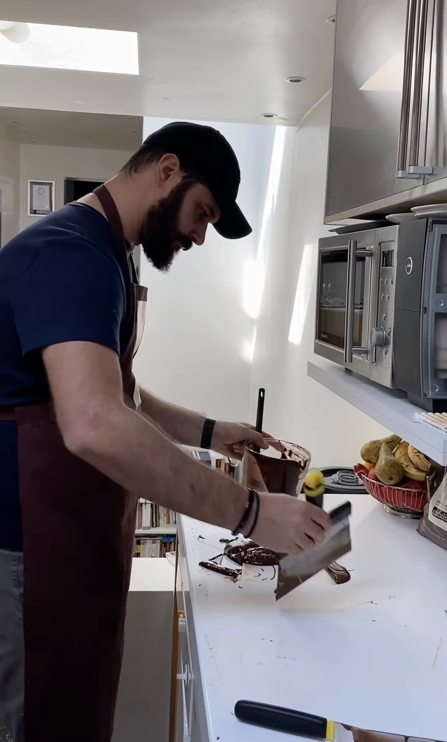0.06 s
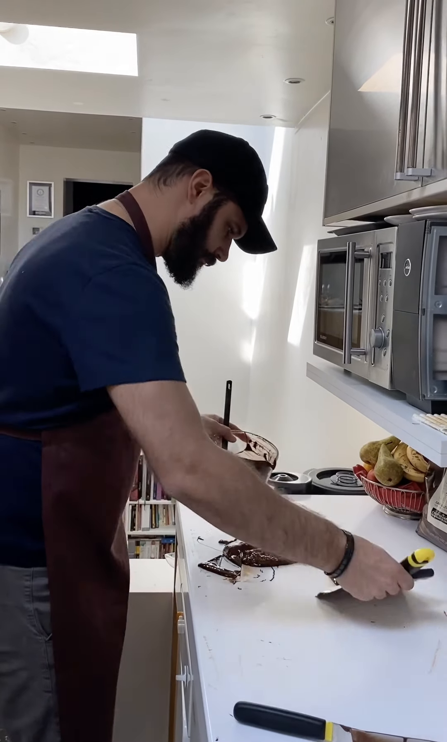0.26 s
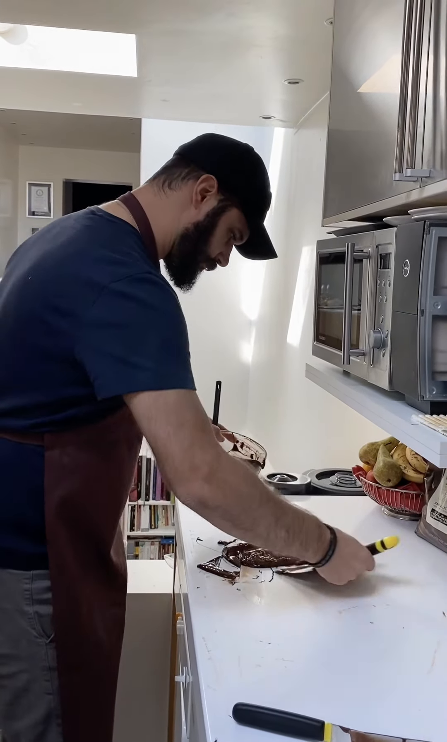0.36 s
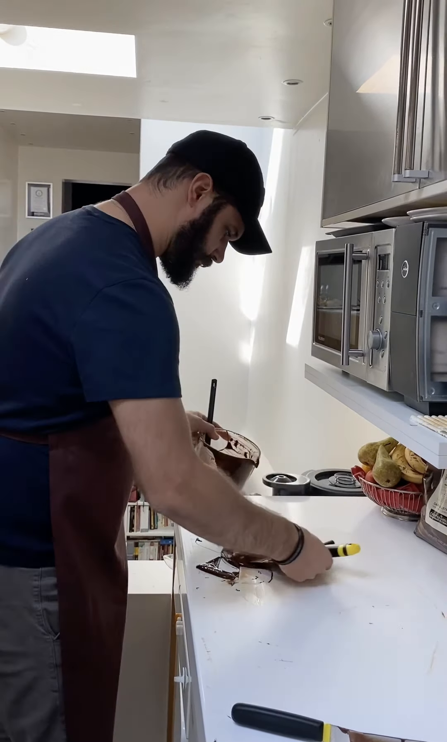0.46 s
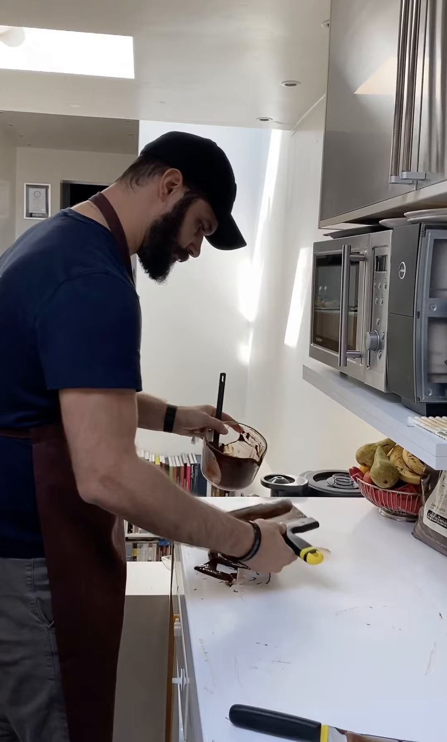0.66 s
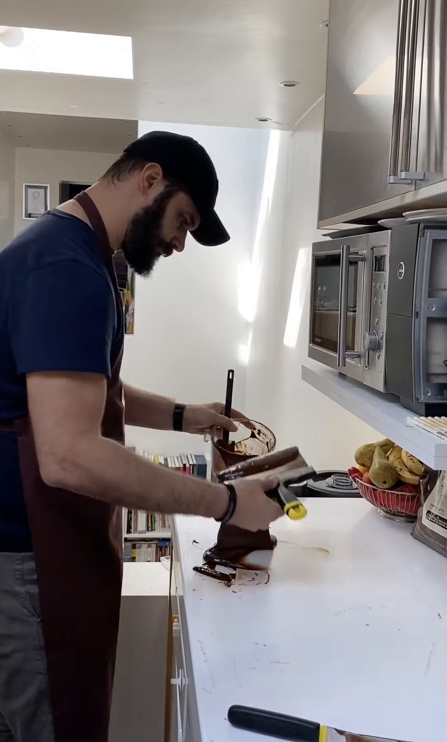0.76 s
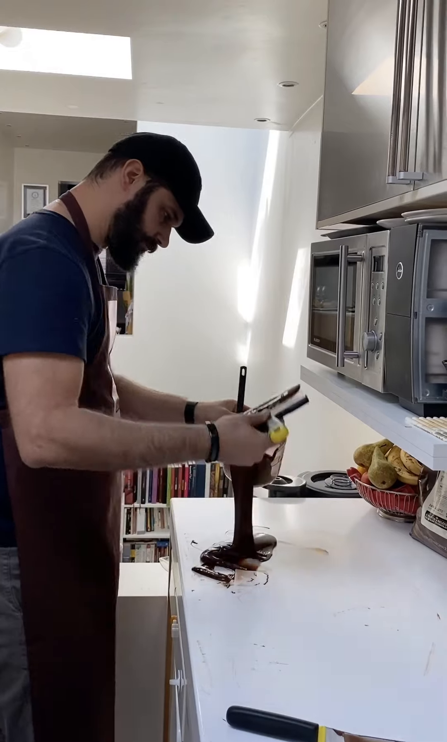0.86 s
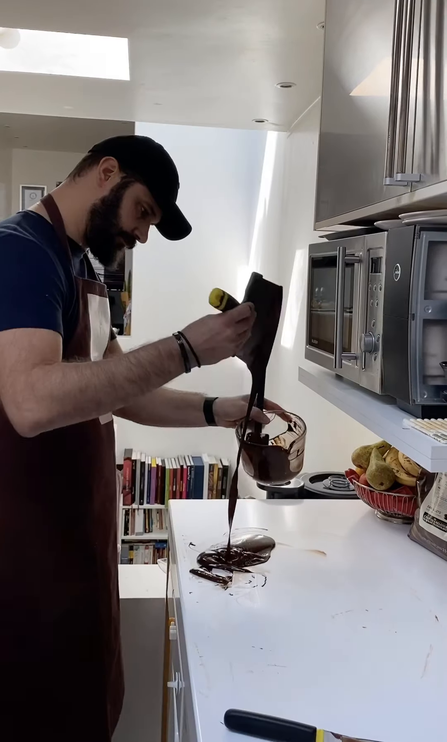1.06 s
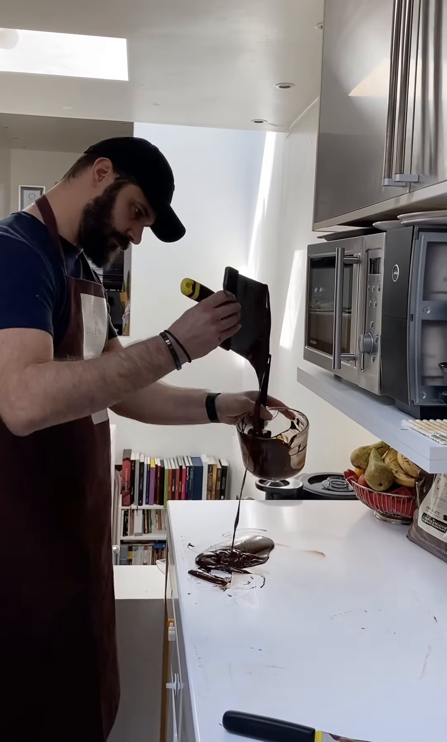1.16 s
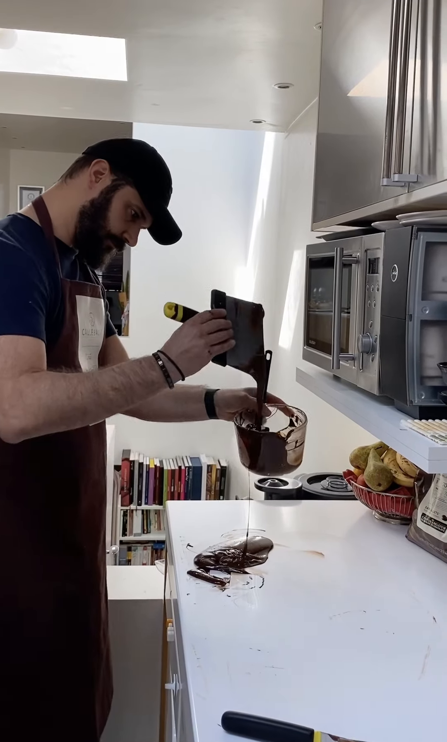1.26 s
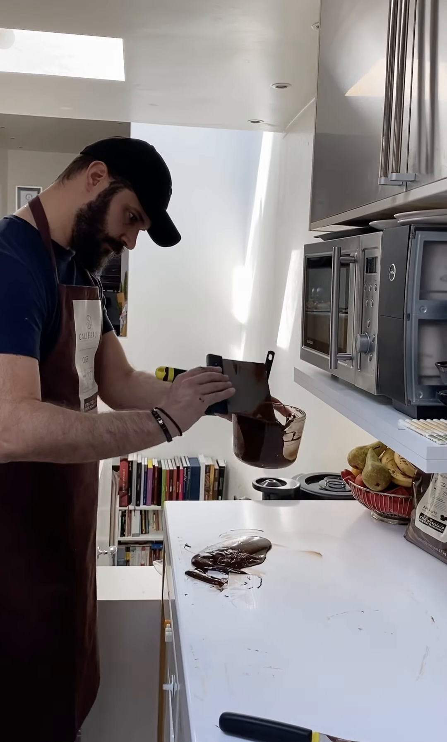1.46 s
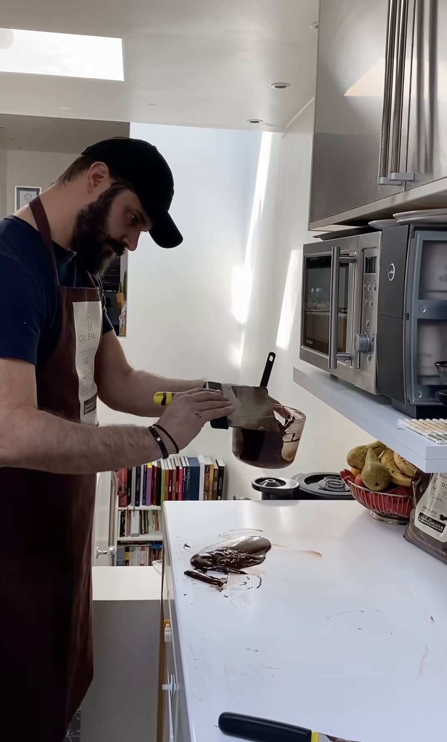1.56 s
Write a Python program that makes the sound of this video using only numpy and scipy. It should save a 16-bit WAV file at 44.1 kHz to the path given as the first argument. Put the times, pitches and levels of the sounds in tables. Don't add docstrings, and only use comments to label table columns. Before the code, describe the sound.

A metal scraper hits and scrapes a stone counter, close in stereo. Its edge ticks at 0.06 s, slides briefly, then clacks loudly at 0.13 s with a short metallic ring and chatter. A bright gritty drag swells around 0.3 s and fades by 0.5 s. Quiet room hum remains; cloth rustles near 1.05 s, a bowl is faintly tapped at 1.42 s, and a soft wipe starts by 1.6 s.

```python
import sys
import numpy as np
from scipy import signal
from scipy.fft import rfft, irfft
from scipy.io import wavfile
from scipy.ndimage import uniform_filter1d

SR = 44100
rng = np.random.default_rng(int(sys.argv[2]) if len(sys.argv) > 2 else 0)


def nominal_scale(level):
    x = np.asarray(level, float) / 20
    return 10 ** x


def generate_wav(signal):
    frames = np.transpose(np.atleast_2d(signal))
    scaled = np.clip(frames, -1, 1) * 32767
    pcm = np.round(scaled).astype(np.int16)
    wavfile.write(sys.argv[1], SR, pcm)


N = 70560


def read(points, hz):
    f, value = np.transpose(points)
    return np.interp(np.log(hz + 1), np.log(f + 1), value)


def evened(x):
    return x / np.sqrt(np.mean(x ** 2) + 1e-20)


def coloured(x, points):
    hz = np.fft.rfftfreq(N, 1 / SR)
    return irfft(rfft(x) * nominal_scale(read(points, hz)), N)


def along(points):
    s, db = np.transpose(points)[:2]
    level = np.interp(np.arange(N) / SR, s, db, left=-150, right=-150)
    return uniform_filter1d(nominal_scale(level), size=90)


def add(mix, s, sound):
    part = mix[round(s * SR):][:len(sound)]
    part += sound[:len(part)]


def resonate(x, hz, width):
    turn = np.exp(2j * np.pi * hz * np.arange(len(x)) / SR)
    r = np.exp(-np.pi * width / SR)
    return 2 * (turn * signal.lfilter([1 - r], [1, -r], x / turn + 1e-18)).real


def alike(a, b, points):
    same = np.clip(read(points, np.fft.rfftfreq(len(a), 1 / SR)), -1, 1)
    mid = rfft(a) * np.sqrt(1 + same)
    side = rfft(b) * np.sqrt(1 - same)
    return irfft(np.array([mid + side, mid - side]), len(a)) / np.sqrt(2)


def ports(x):
    # (frequency [Hz], level [dB])
    side_colour = [(60, -33), (300, -17.5), (1000, -9.5), (1700, -6), (2600, -4.5), (5300, 3.5), (6000, -4),
                   (15000, 5)]
    turn_rad, delay_s = 3.8, .00054
    hz = np.fft.rfftfreq(N, 1 / SR)
    phase = turn_rad + 2 * np.pi * hz * delay_s
    side = irfft(rfft(x) * nominal_scale(read(side_colour, hz)) * np.exp(-1j * phase), N)
    return np.array([x + side, x - side])


def kitchen():
    # (frequency [Hz], level [dB per Hz])
    hum_colour = [(25, -22), (60, -10), (130, -24.5), (300, -23), (600, -33.5), (1300, -39.5), (2500, -44),
                  (15000, -69.5)]
    # (frequency [Hz], likeness [-1 to 1])
    hum_same = [(60, 0.81), (180, 0.72), (550, 0.1), (1650, 1), (4970, -0.15), (15000, -0.66)]
    hum_db, motor_db = -59.5, -57.5
    motor_hz, motor_width_hz = 84, 30
    throb_per_s, throb = 10, .7
    a, b, c, d = rng.standard_normal((4, N))
    around = alike(coloured(a, hum_colour), coloured(b, hum_colour), hum_same)
    air = evened(around + 0.27 * ports(coloured(d, hum_colour)))
    motor = resonate(resonate(c, motor_hz, motor_width_hz), motor_hz, motor_width_hz)
    wander = evened(resonate(c[::-1], 1.5, 6))
    beat = np.cumsum(throb_per_s * (1 + 0.11 * wander)) / SR
    steady = motor / (abs(signal.hilbert(motor)) + 0.1 * motor.std())
    motor = steady * (1 + throb * np.cos(2 * np.pi * beat))
    motor = resonate(resonate(motor, motor_hz, 45), motor_hz, 45)
    return nominal_scale(hum_db) * air + nominal_scale(motor_db) * evened(motor)


def friction(colour, sing_db):
    # (frequency [Hz], width [Hz], level [dB])
    blade_song = [(1083, 330, -0.5), (1870, 90, -12), (2770, 150, -10.5), (3900, 150, -6),
                  (4340, 37, -10.5), (5450, 400, -6.5), (7000, 250, -8.5), (9300, 150, -13)]
    grains_per_s, grain_spread_db = 5900, 3.5
    sizes = nominal_scale(grain_spread_db * np.minimum(rng.exponential(1, N), 4))
    slips = sizes * rng.choice([-1., 1.], N) * (rng.random(N) < grains_per_s / SR)
    sing = sum(nominal_scale(db) * evened(resonate(slips, hz, width)) for hz, width, db in blade_song)
    return evened(evened(coloured(slips, colour)) + nominal_scale(sing_db) * evened(sing))


def sleeve():
    # (frequency [Hz], level [dB])
    cloth = [(250, -9.5), (900, 4.5), (2400, 2.5), (4000, -4), (6000, -4), (9000, -10), (12000, -10.5),
             (16500, -13.5)]
    # (time [s], level [dB])
    reach = [(0, -76), (.066, -76)]
    # (time [s], level [dB])
    lift = [(.6, -73.5), (.8, -74), (.92, -73.5), (1.0, -68), (1.07, -66.5), (1.12, -75), (1.16, -88),
            (1.3, -86)]
    return friction(cloth, -21) * (along(reach) + along(lift))


def modes(table, t):
    ring = 0
    for k, (hz, db, t60) in enumerate(table):
        ring = ring + (-1) ** k * nominal_scale(db - 60 * t / t60) * np.sin(2 * np.pi * hz * t)
    return (1 - np.exp(-t / 0.00069)) * ring


def knock(t):
    # (frequency [Hz], level [dB], t60 [s])
    slap = [(795.6, 2.5, 0.027), (1216, -1.5, .022), (1835, -3.5, 0.021), (2044, -4.5, 0.021)]
    flip_hz = 1500
    ring = 0
    for hz, db, t60 in slap:
        ring = ring + np.sign(hz - flip_hz) * nominal_scale(db - 60 * t / t60) * np.cos(2 * np.pi * hz * t)
    return (t > 0) * ring


def contact_tick(t):
    # (frequency [Hz], level [dB])
    tick_colour = [(1500, -5.5), (4000, -0.5), (7000, -3.5), (11000, -14), (16000, -16)]
    swell_s = 0.00086
    tick = np.zeros(N)
    lead = 500
    envelope = (t / swell_s) ** 2 * np.exp(-t / swell_s) * 2
    tick[lead:lead + len(t)] = rng.standard_normal(len(t)) * envelope
    return coloured(tick, tick_colour)[lead:lead + len(t)]


def blows():
    # (time [s], level [dB], thud [dB], tick [dB])
    hits = [
        (0.063, -25, -8.5, -6),
        (.1284, -1, -3, 2),
        (2.3, -70, -9.5, 22.5),
        (1.4172, -74, -8.5, 20.5),
    ]
    # (frequency [Hz], level [dB], t60 [s])
    blade = [(565, -12, 0.02), (906.4, -11, 0.13), (1058, -6, 0.079), (1173.6, -12.5, 0.21),
             (1460, -11.5, .04), (1879, -11.5, 0.085), (2880, -14, 0.017), (3345, -10.5, .02),
             (3660, -12, .025), (7640, -12, 0.0069)]
    # (frequency [Hz], level [dB], t60 [s])
    thud = [(62, -35.5, 0.35), (165, -22, 0.045), (424, -34, .08)]
    # (frequency [Hz], level [dB], t60 [s])
    settle = [(95, -4, 0.17), (260, -0.5, 0.25), (330, -5, 0.062), (453, -0.5, 0.12)]
    # (frequency [Hz], level [dB], t60 [s])
    rim = [(2050, 0, .025), (4300, -10, .015)]
    # (frequency [Hz], level [dB], t60 [s])
    bowl = [(370, -2, .05), (660, 0, .04), (750, -5, .03), (1400, -7, .03), (2100, -10, .03),
            (4000, -10, .02), (7500, -12, .015)]
    tick_gain_db, bang_lag_s = -10.5, .0011
    out = np.zeros(N)
    t = np.arange(SR // 2) / SR
    late = np.maximum(t - bang_lag_s, 0)
    for s, db, thud_db, tick_db in hits:
        blow = 0.31 * modes(blade, late) + .3 * knock(late)
        blow = blow + nominal_scale(thud_db) * modes(thud, late)
        blow = blow + nominal_scale(tick_gain_db + tick_db) * contact_tick(t)
        add(out, s, nominal_scale(db) * blow)
    add(out, .071, nominal_scale(-40) * np.minimum(t / 0.001, 1) * modes(settle, t))
    add(out, 1.418, nominal_scale(-58) * modes(rim, t))
    add(out, 1.4435, nominal_scale(-49) * modes(bowl, t))
    return out


def counter_echoes(x):
    # (delay [s], level [dB])
    bounces = [(.006, -15.5), (.0125, -13.5), (.0165, -14), (.0195, -12.5), (.0235, -15), (.027, -10)]
    echoes = np.zeros(2000)
    echoes[0] = 1
    for k, (s, db) in enumerate(bounces):
        echoes[round(s * SR)] = nominal_scale(db) * (-1) ** k
    return signal.oaconvolve(x, echoes)[:N]


def room(x):
    # (frequency [Hz], t60 [s])
    decay = [(100, 0.92), (500, .5), (1200, 0.42), (3000, 0.58), (8000, .3), (15000, 0.067)]
    # (frequency [Hz], likeness [-1 to 1])
    tail_same = [(100, 1), (400, .9), (1200, 0), (3000, -0.033), (9000, 0), (14000, 0)]
    taps = np.zeros((2, SR))
    at = np.arange(300, SR - 20, 20) + rng.integers(0, 20, (2, (SR - 301) // 20))
    np.put_along_axis(taps, at, rng.choice([-1., 1.], at.shape), 1)
    hz, t, z = signal.stft(taps, SR, nperseg=256)
    fade = nominal_scale(-60 * t / read(decay, hz)[:, None])
    tail = signal.istft(z * fade, SR, nperseg=256)[1]
    tail = alike(*tail, tail_same)
    return signal.fftconvolve(x[None], tail / np.linalg.norm(tail[0]), axes=1)[:, :N]


def soft_slide():
    # (frequency [Hz], level [dB])
    soft = [(250, -8.5), (1000, -3), (2400, 3), (4000, -1), (6000, -3.5), (9000, -14.5), (12000, -21.5),
            (16500, -20)]
    # (time [s], level [dB])
    drag = [(.066, -45.5), (.09, -52), (.105, -64.5), (.112, -51), (.128, -44)]
    # (time [s], level [dB])
    wipe = [(1.419, -71), (1.44, -68), (1.447, -70.5), (1.5, -69), (1.55, -65.5), (1.59, -59.5),
            (1.62, -77)]
    return friction(soft, -12) * (along(drag) + along(wipe))


def chatter():
    # (frequency [Hz], level [dB])
    shiver = [(400, -20), (1000, -3), (2000, -4.5), (2500, -9.5), (3900, 0), (5000, -2), (9000, -9),
              (16000, -10.5)]
    # (time [s], level [dB])
    contact = [(.131, -36), (.15, -36.5), (.18, -43.5), (.23, -57.5)]
    return friction(shiver, -12.5) * along(contact)


def stroke():
    # (frequency [Hz], level [dB])
    grit = [(250, -17.5), (1000, -19), (2400, -3.5), (4000, -3), (6000, 2), (9000, -1.5), (12000, -2),
            (16500, -20)]
    # (time [s], level [dB])
    pressure = [(.135, -33.5), (.19, -45.5), (.25, -44.5), (.275, -38), (.33, -38.5), (.4, -44.5),
                (.46, -56.5), (.54, -72), (.66, -80.5)]
    return friction(grit, -4) * along(pressure)


def scene():
    hum = kitchen()
    bare = blows()
    rub = sleeve() + soft_slide() + stroke()
    hit_wet_db, rub_wet_db = -6, -3
    wet = room(nominal_scale(hit_wet_db) * bare + nominal_scale(rub_wet_db) * rub)
    return ports(counter_echoes(bare) + rub + chatter()) + wet + hum


def low_pass(x):
    return signal.sosfilt(signal.butter(12, 15930, fs=SR, output="sos"), x)


def record(dry):
    # (frequency [Hz], level [dB])
    mid_colour = [(20, -32), (42, 0), (10500, 0), (12500, 1), (13200, -9), (16000, -12)]
    # (frequency [Hz], level [dB])
    side_response = [(20, -37.5), (100, -1.5), (1200, 1.5), (1700, -7.5), (2400, 3.5), (5300, 0), (6000, -2.5),
                     (15000, 3.5)]
    mid = coloured(dry[0] + dry[1], mid_colour) / 2
    side = coloured(dry[0] - dry[1], side_response) / 2
    return low_pass(np.array([mid + side, mid - side]))


dry = scene()
out = record(dry)
generate_wav(out)
```